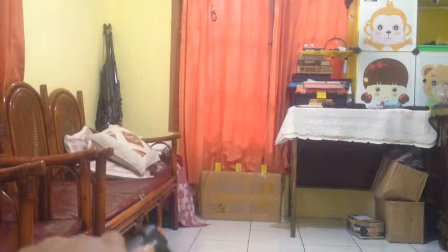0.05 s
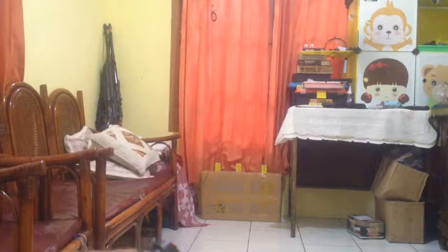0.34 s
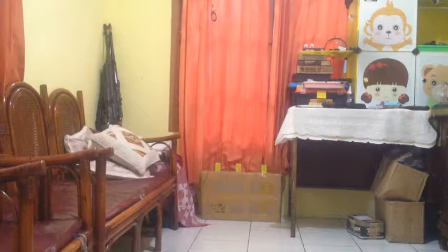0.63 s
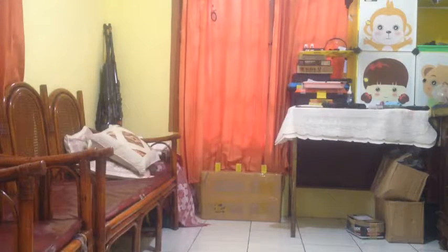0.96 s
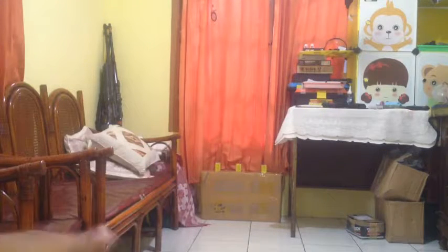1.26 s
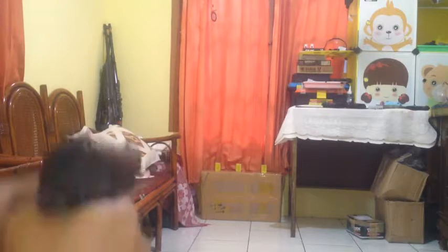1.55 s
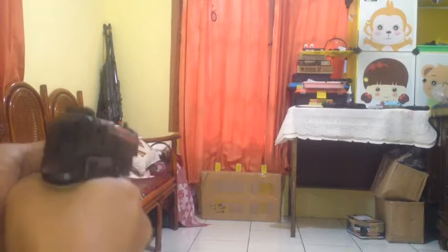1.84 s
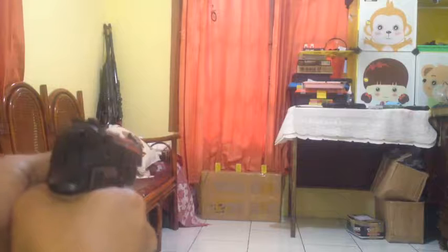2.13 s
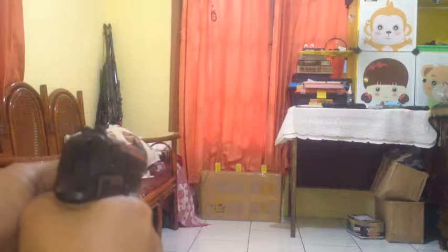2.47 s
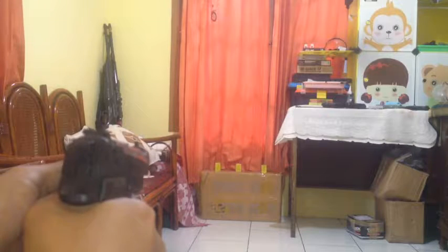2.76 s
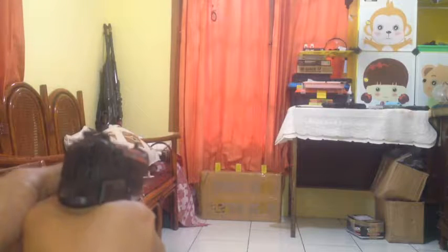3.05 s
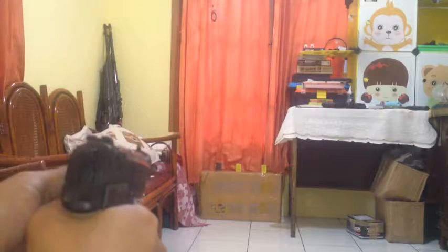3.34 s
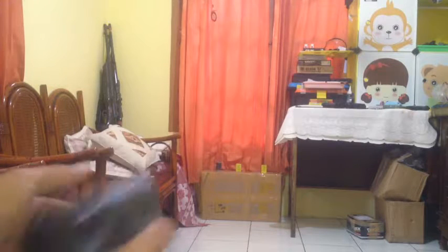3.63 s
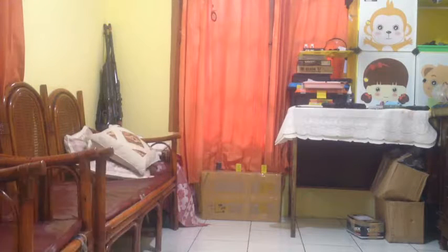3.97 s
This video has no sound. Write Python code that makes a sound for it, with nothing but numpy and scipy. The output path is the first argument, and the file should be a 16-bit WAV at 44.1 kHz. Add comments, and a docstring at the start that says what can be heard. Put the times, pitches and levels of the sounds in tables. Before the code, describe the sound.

A plastic toy pistol is cocked close by, ticking and scraping, latching at 0.7 seconds and clacking home near 1 second. A few ticks and soft hand rubbing give way to low room noise. At about 3.2 seconds it fires with a sharp crack and puff of air; the pellet immediately strikes across the small room and rebounds, echoing briefly. The grip creaks faintly from 3.6 to 4 seconds.

```python
"""In a small tiled room, a spring-powered plastic toy pistol is cocked and fired close to the microphone.
The slide scrapes and ticks back by stick-slip friction, latches and snaps home. The piston slams, driving
out a puff of air and ringing barrel, shell and spring; the pellet strikes across the room and rebounds.
The grip creaks as the pistol is lowered. Low room noise, hiss and faint distant tones lie underneath."""
import sys
import numpy as np
from scipy import signal
from scipy.fft import rfft, irfft
from scipy.io import wavfile

SR = 44100
rng = np.random.default_rng(int(sys.argv[2]) if len(sys.argv) > 2 else 0)


def store_wav(level_fs):
    """Save 16-bit WAV to argv[1]."""
    pcm = np.round(np.clip(np.atleast_2d(level_fs), -1, 1) * 32767)
    wavfile.write(sys.argv[1], SR, pcm.T.astype(np.int16))


N = 4 * SR

# Spectrum of the plastic shell's body (frequency [Hz], relative level [dB])
SHELL_SPECTRUM = [(100, -47), (400, -16), (950, -9.5), (1350, -2.5), (1570, -4), (2070, 1), (2720, -7),
                  (3020, -5), (3600, -14.5), (4600, -11), (6000, -18.5), (15000, -38)]
# Spectrum of the sharp edge of a contact on the shell (frequency [Hz], relative level [dB])
EDGE_SPECTRUM = [(500, -16.5), (5700, 1), (9000, -5.5), (12000, -2), (15000, 1.5)]
# Spectrum of a bright crack (frequency [Hz], relative level [dB])
CRACK_SPECTRUM = [(500, -36), (2500, 7), (4500, -4.5), (7000, 1.5), (10000, -5), (13500, 5.5), (15000, 3)]
EDGE_DB, SLIP_RISE_S = -11, 0.0006


def piston_shot():
    """Impact excitation: the piston's slam gives a crack, a puff of air and freely decaying modes."""
    # Modes of barrel, shell and spring (frequency [Hz], level [dB], T60 [s])
    modes = [(243.4, -26.5, 0.19), (353, -21, 0.088), (755, -18.5, 0.062), (841, -19, 0.115),
             (941, -24.5, 0.1), (2447, -19, 0.08), (3420, -26.5, 0.16)]
    # Spectrum of the expelled air (frequency [Hz], relative level [dB])
    puff_spectrum = [(90, -18.5), (260, -1), (800, 6.5), (1200, -3), (1900, -2), (3000, -8.5), (5000, -20),
                     (15000, -38.5)]
    start_s, rise_s, hold_s, ring_delay_s = 3.2252, 0.0031, 0.0023, 0.0019
    t = np.arange(SR // 2) / SR
    ring = sum(amp(db - 60 * t / t60) * np.cos(2 * np.pi * hz * t) for hz, db, t60 in modes)
    puff = amp(-11) * impact(puff_spectrum, rise_s, t60=0.054, wet_db=-6, hold=hold_s)
    crack = amp(-11) * impact(CRACK_SPECTRUM, rise_s, t60=0.04, wet_db=-9, hold=hold_s)
    return place(start_s, puff + crack) + reverberate(place(start_s + ring_delay_s, ring), wet_db=-4)


def pellet_strike():
    """Reflection: a far strike is heard mostly through floor and wall echoes; a duller rebound follows."""
    # The strike and its rebound (time [s], level [dB], relative treble [dB], T60 [s])
    strike, rebound = [(3.303, -14, 0, 0.0072), (3.3302, -19, -11, 0.028)]
    # Early reflections of the strike (delay [s], relative level [dB])
    reflections = [(.0042, -2), (.0066, 0), (0.0136, -3)]
    rise_s = 0.000309

    def contact(s, db, treble_db, t60, wet_db):
        """One impact of the pellet, with its reverberation."""
        # Spectrum of the pellet's knock (frequency [Hz], relative level [dB])
        knock_spectrum = [(100, -35), (500, -17.5), (1600, -3.5), (2200, -2), (3200, -14.5), (6000, -18),
                          (15000, -60)]
        knock = impact(knock_spectrum, rise_s, t60, wet_db)
        crack = amp(treble_db) * impact(CRACK_SPECTRUM, rise_s, t60, wet_db)
        return place(s, amp(db) * (knock + crack))

    s, db, treble_db, t60 = strike
    echoes = sum(contact(s + delay, db + echo_db, treble_db, t60, wet_db=-8)
                 for delay, echo_db in reflections)
    return contact(*strike, wet_db=4.5) + echoes + contact(*rebound, wet_db=-8)


def slide_clacks():
    """Damped impacts: the slide latches at the back, then rattles home, shaking the shell at each stop."""
    # Hard stops (time [s], level [dB], edge offset [dB], relative knock [dB], rise [s], T60 [s])
    stops = [(0.6633, -21, 12, -26, 0.0036, 0.047), (.919, -25.5, 13, -12.5, 0.00057, 0.021),
             (.927, -37.5, 8, -1.5, 0.0016, 0.042), (.964, -32.5, 12.5, 0, 0.001014, 0.051),
             (0.9742, -33, -10, -2.5, 0.00079, 0.044)]
    # Spectrum of the shell's low knock (frequency [Hz], relative level [dB])
    knock_spectrum = [(100, -41), (540, 1), (800, -6), (2000, -6.5), (8000, -66)]
    wet_db = -5
    out = np.zeros(N)
    for s, db, edge_db, knock_db, rise, t60 in stops:
        body = impact(SHELL_SPECTRUM, rise, t60, wet_db)
        knock = amp(knock_db) * impact(knock_spectrum, rise, t60, wet_db)
        edge = amp(EDGE_DB + edge_db) * impact(EDGE_SPECTRUM, rise, t60 / 2, wet_db)
        out += place(s, amp(db) * (body + knock + edge))
    return out


def shell_ticks():
    """Stick-slip: shell and slide give way under the hands in single slips, each a short tick."""
    # Single slips (time [s], level [dB], edge offset [dB])
    slips = [(0.039, -42.5, 2), (.074, -44.5, -14), (0.139, -41, -3), (0.206, -39, -2), (.275, -41, -2),
             (0.312, -37, -9), (0.395, -35, 2.5), (0.455, -36, 1), (0.55, -35, -2), (0.773, -43, 20),
             (.804, -32, -1), (.944, -44, 20), (1.091, -37.5, 6), (1.28, -45.5, 9), (1.375, -38, 12.5),
             (1.636, -52, 10)]
    # Spectrum of a tick (frequency [Hz], relative level [dB])
    tick_spectrum = [(200, -4), (900, -7.5), (1750, 1), (2350, -5), (3500, -15.5), (15000, -38)]
    t60 = 0.012
    out = np.zeros(N)
    for s, db, edge_db in slips:
        body = burst(tick_spectrum, SLIP_RISE_S, t60)
        edge = amp(EDGE_DB + edge_db) * burst(EDGE_SPECTRUM, SLIP_RISE_S, t60)
        out += place(s, amp(db) * (body + edge))
    return reverberate(out, wet_db=-3)


def grip_creaks():
    """Damped resonance: each slip of the grip rings one hollow spot of the shell for a few cycles."""
    # Slips as the hand relaxes and lowers the pistol (time [s], level [dB], resonance [Hz])
    slips = [(3.5618, -38.5, 1800), (3.5769, -33.5, 1790), (3.5914, -35, 1700), (3.62, -34.5, 1800),
             (3.68, -42.5, 1400), (3.745, -44, 1250), (3.835, -47.5, 4990), (3.902, -41, 1660),
             (3.938, -31, 1100), (3.969, -34, 1460), (3.987, -48, 1750)]
    t60 = 0.005
    t = np.arange(SR // 10) / SR
    out = np.zeros(N)
    for s, db, hz in slips:
        ring = envelope(t, SLIP_RISE_S, t60) * np.sin(2 * np.pi * hz * t)
        edge = amp(-13.5) * burst(EDGE_SPECTRUM, SLIP_RISE_S, t60)
        out += amp(db) * (place(s, ring) + place(s, edge))
    return reverberate(out, wet_db=-9)


def friction():
    """Sliding friction: clumps of tiny slips excite shell and rail; hand and sleeve rub softly."""
    # Course of the slide's scraping (time [s], level [dB])
    scrape_levels = [(0, -61), (.3, -59.5), (.47, -50.5), (.56, -52), (.65, -42.5), (.7, -40), (.8, -51.5),
                     (.9, -52.5), (.95, -39.5), (1.02, -51.5), (1.2, -66.5), (1.7, -75.5), (3.55, -78),
                     (3.9, -61.5), (4, -51.5)]
    # Course of the rubbing of hand and sleeve (time [s], level [dB])
    rub_levels = [(0, -63.5), (.8, -52), (1.27, -61.5), (1.41, -53), (1.95, -69), (2.4, -64.5), (2.7, -69),
                  (4, -64.5)]
    # Spectrum of that rubbing (frequency [Hz], relative level [dB])
    rub_spectrum = [(100, -1.5), (400, 0.5), (750, 5.5), (1300, -1), (2300, -4.5), (3500, -17.5),
                    (9500, -24), (14500, -18)]
    slips_per_s, spread_db, clump_db = 1300, 2.5, 4.5
    scrape_gain = gain_curve(scrape_levels)
    sizes = amp(spread_db * np.minimum(rng.exponential(1, N), 4)) * rng.choice([-1., 1.], N)
    clumps = amp(clump_db * np.clip(noise_band(0, width_hz=39.4), -2, 2))
    slipping = rng.random(N) < slips_per_s / SR
    slips = unit_rms(clumps * sizes * slipping) * scrape_gain
    rail = amp(-5.5) * unit_rms(clumps * noise_band(1330, width_hz=170)) * scrape_gain
    shell = colour(slips, SHELL_SPECTRUM) + amp(-11.5) * colour(slips, EDGE_SPECTRUM)
    rub = colour(rng.standard_normal(N), rub_spectrum) * gain_curve(rub_levels)
    return reverberate(shell + rail + rub, wet_db=-13.5)


def hand_swish():
    """Friction noise: one brief, bright slip of the hand as the pistol is lowered."""
    return place(3.801, amp(-56) * burst(CRACK_SPECTRUM, rise=0.0018, t60=0.25, size=8192))


def room_tail():
    """Diffuse reverberation: a dense response of unit energy, each band dying at its own rate."""
    # Decay of the tiled room (frequency [Hz], T60 [s], relative level [dB])
    bands = np.array([(100, 0.29, -2.5), (794, 0.38, 0.5), (4630, 0.35, 1.5), (15000, 0.25, 0)])
    build_up_s = 0.0038
    hz, t, spectra = signal.stft(rng.choice([-1., 1.], SR // 2), SR, nperseg=256)
    t60 = at_frequency(bands[:, [0, 1]], hz)[:, None]
    db = at_frequency(bands[:, [0, 2]], hz)[:, None]
    tail = signal.istft(spectra * amp(db - 60 * t / t60), SR, nperseg=256)[1]
    tail *= np.minimum(np.arange(len(tail)) / SR / build_up_s, 1)
    return tail / np.linalg.norm(tail)


def background():
    """Ambient noise: a steady low rumble and hiss, with three faint, distant narrow-band tones."""
    # Spectrum of the steady noise (frequency [Hz], relative spectral density [dB])
    floor_spectrum = [(25, -20.5), (80, -13.5), (122, 0.5), (200, -2), (800, -21), (1500, -34.5),
                      (4000, -32), (9800, -42), (13700, -32.5)]
    # Distant tones (time [s], duration [s], frequency [Hz], level [dB])
    far_tones = [(1.689, 0.18, 1680, -70.5), (2.1, 0.57, 1455, -70), (2.837, 0.38, 825, -67)]
    floor_gains = amp(at_frequency(floor_spectrum, np.fft.rfftfreq(N, 1 / SR)))
    out = amp(-57) * shaped_noise(floor_gains)
    for s, duration, hz, db in far_tones:
        swell = np.sqrt(np.hanning(round(duration * SR)))
        out += amp(db) * place(s, swell) * noise_band(hz, width_hz=33)
    return out


def impact(spectrum, rise, t60, wet_db, hold=0):
    """Direct and reverberant field: a hard contact and the wash of like spectrum it leaves in the room."""
    direct = burst(spectrum, rise, t60, hold)
    wash = place(rise + hold, colour(room_tail(), spectrum))
    return place(0, direct) + amp(wet_db) * np.linalg.norm(direct) * wash


def burst(spectrum, rise, t60, hold=0, size=4096):
    """Source and filter: a short contact is a broadband noise pulse, coloured by the given spectrum."""
    shape = envelope(np.arange(size) / SR, rise, t60, hold)
    pulse = rng.standard_normal(size)
    for _ in range(3):  # impose the envelope and a flat spectrum in turn
        carrier = np.cos(np.angle(signal.hilbert(pulse)))
        bins = rfft(shape * carrier)
        pulse = irfft(bins / (abs(bins) + 1e-12))
    pulse *= np.minimum(10 * shape, 1)  # fade what lies outside the envelope
    return colour(pulse * np.linalg.norm(shape) / np.linalg.norm(pulse), spectrum)


def envelope(t, rise, t60, hold=0):
    """Exponential damping: after a linear rise and a hold, the level falls 60 dB in t60 seconds."""
    return np.minimum(t / rise, 1) * amp(-60 * np.maximum(t - rise - hold, 0) / t60)


def reverberate(x, wet_db):
    """Convolution: the direct sound plus the room's response to it."""
    return x + amp(wet_db) * signal.oaconvolve(x, room_tail())[:N]


def colour(x, spectrum):
    """Minimum-phase filtering: a causal response of unit energy with the given spectrum."""
    hz = abs(np.fft.fftfreq(4096, 1 / SR))
    log_gain = np.log(amp(at_frequency(spectrum, hz)))
    response = np.exp(np.conj(signal.hilbert(log_gain)))
    taps = np.fft.ifft(response).real[:2048]
    return signal.oaconvolve(x, taps / np.linalg.norm(taps))[:len(x)]


def noise_band(centre_hz, width_hz):
    """Narrow-band noise with a Gaussian spectrum."""
    hz = np.fft.rfftfreq(N, 1 / SR)
    return shaped_noise(np.exp(-((hz - centre_hz) / width_hz) ** 2))


def shaped_noise(gains):
    """Spectral shaping: white noise weighted bin by bin, at unit rms."""
    return unit_rms(irfft(rfft(rng.standard_normal(N)) * gains, N))


def amp(db):
    """Amplitude ratio of a level in decibels."""
    return 10 ** (np.asarray(db) / 20)


def unit_rms(x):
    """Normalisation to an rms of 1."""
    return x / np.sqrt(np.mean(x ** 2) + 1e-20)


def at_frequency(points, hz):
    """Interpolation of (frequency [Hz], value) points on a logarithmic frequency axis."""
    point_hz, values = np.transpose(points)
    return np.interp(np.log(hz + 1), np.log(point_hz + 1), values)


def gain_curve(points):
    """Interpolation of (time [s], level [dB]) points to a gain for every sample."""
    return amp(np.interp(np.arange(N) / SR, *np.transpose(points)))


def place(s, sound):
    """Time delay: a full-length track with the sound starting at s seconds."""
    return np.concatenate([np.zeros(max(round(s * SR), 0)), sound, np.zeros(N)])[:N]


def scene():
    """Superposition: all sources add at one microphone."""
    quiet_sounds = background() + friction() + shell_ticks() + grip_creaks()
    return (quiet_sounds + slide_clacks() + piston_shot() + pellet_strike() + hand_swish())[None]


def record(dry):
    """Saturation and filtering: soft overload of the peaks, the microphone's low cut, a band limit."""
    low_cut_hz, band_limit_hz = 111, 15330
    low_cut = signal.butter(2, low_cut_hz, "highpass", fs=SR, output="sos")
    band_limit = signal.firwin(601, band_limit_hz, window=("kaiser", 8), fs=SR)
    picked_up = signal.sosfilt(low_cut, np.tanh(dry))
    return signal.oaconvolve(picked_up, band_limit[None], "same")


dry = scene()
out = record(dry)
store_wav(out)
```